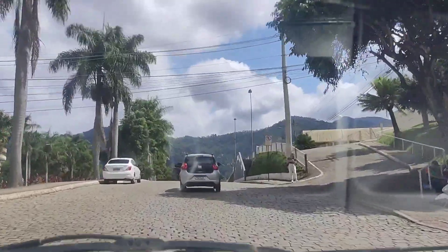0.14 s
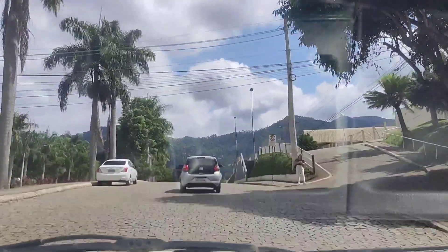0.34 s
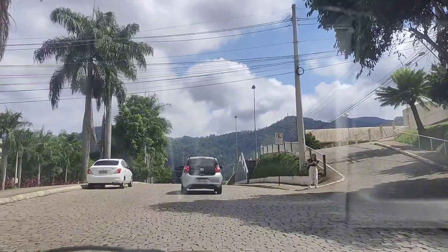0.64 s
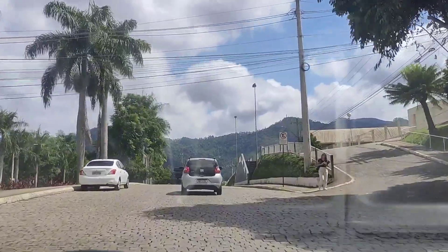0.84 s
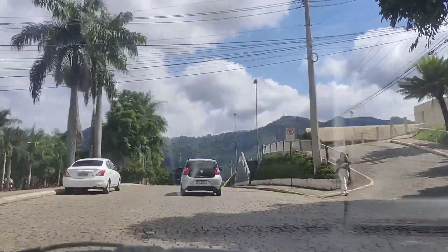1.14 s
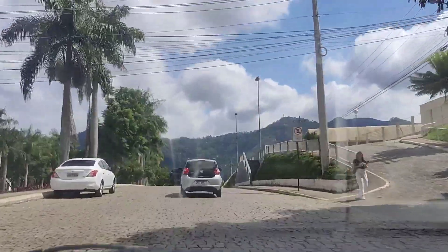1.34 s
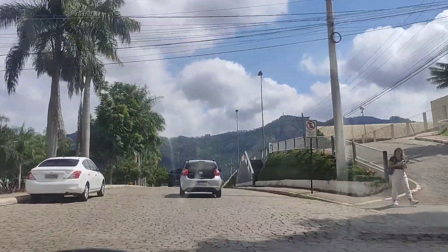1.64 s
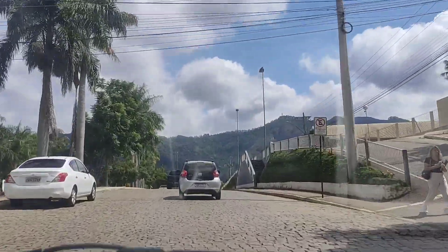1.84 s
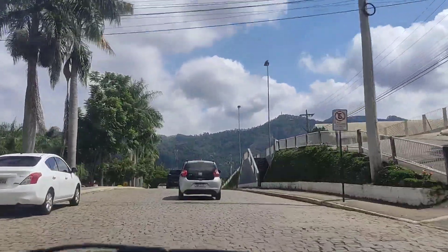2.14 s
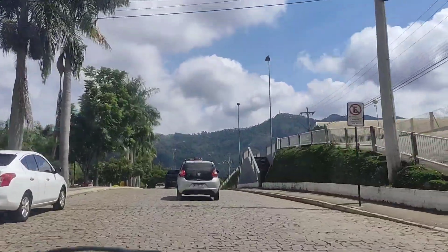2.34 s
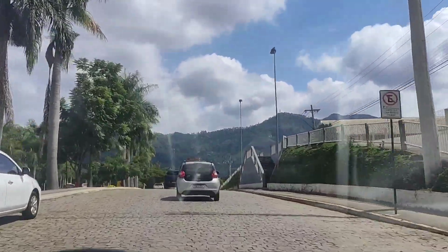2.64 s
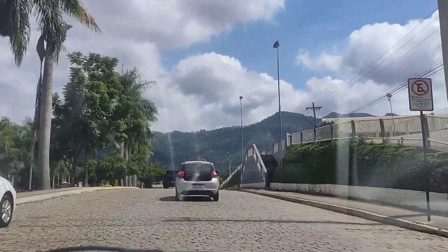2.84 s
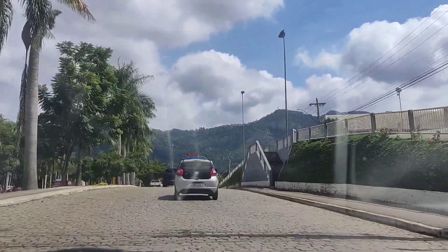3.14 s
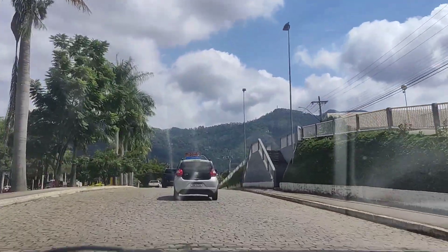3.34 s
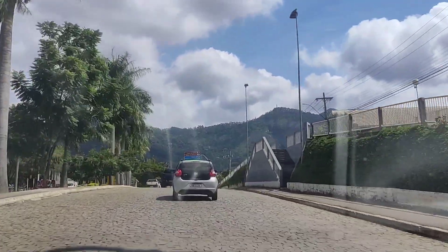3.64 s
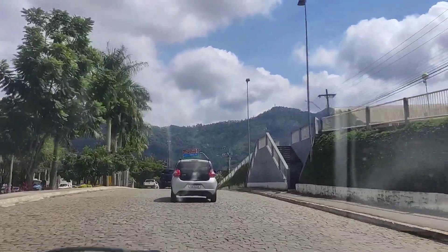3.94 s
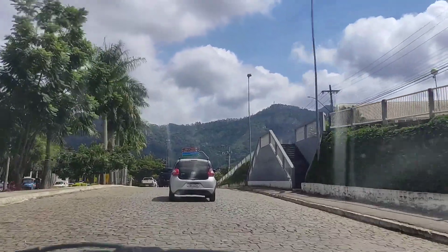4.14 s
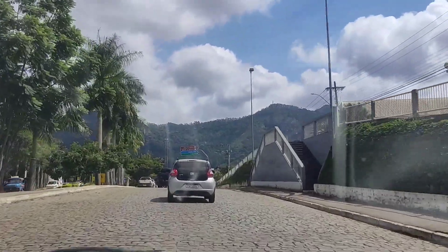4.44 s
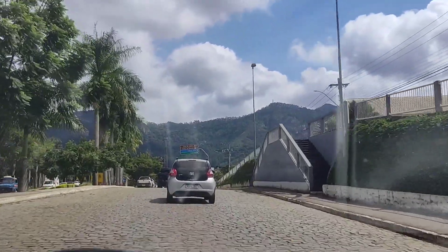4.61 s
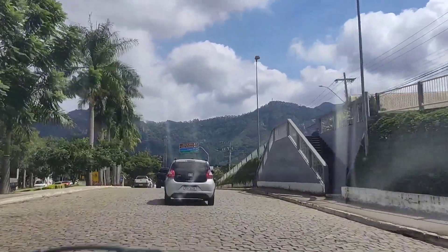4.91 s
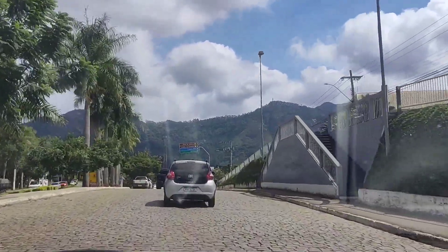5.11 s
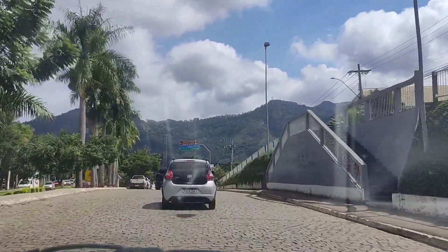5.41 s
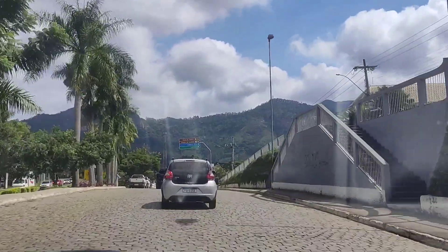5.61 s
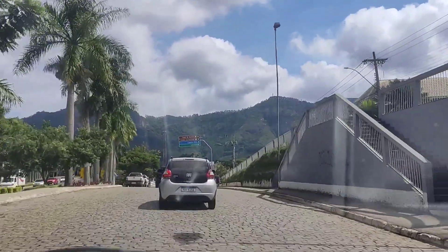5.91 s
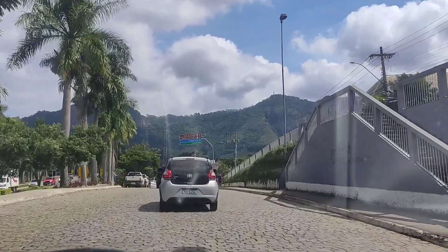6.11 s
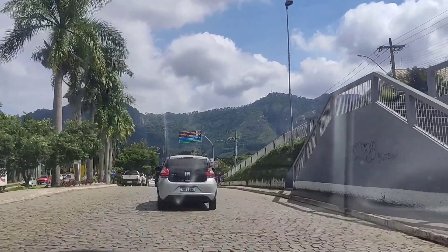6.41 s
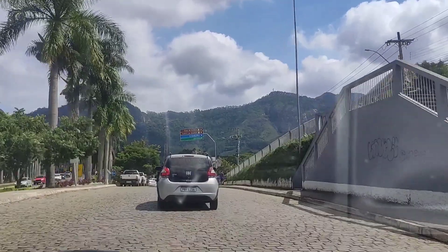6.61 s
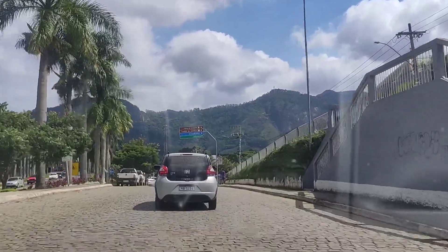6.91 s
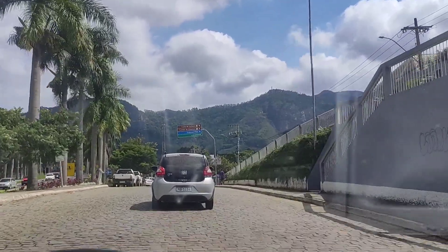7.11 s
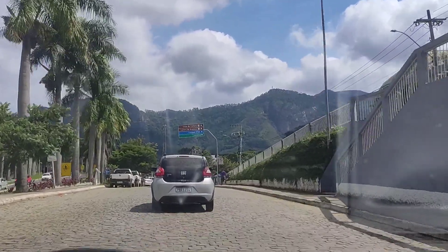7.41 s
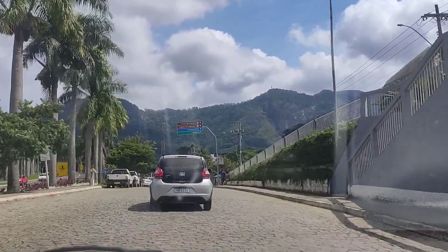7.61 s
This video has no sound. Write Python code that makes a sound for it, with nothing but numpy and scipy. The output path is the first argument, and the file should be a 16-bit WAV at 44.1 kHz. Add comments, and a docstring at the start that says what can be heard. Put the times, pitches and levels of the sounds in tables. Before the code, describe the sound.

A small car rolls slowly over cobblestones, heard from inside the closed cabin for about eight seconds. The main sound is a continuous, uneven low boom from the tyres and body, with a hollow tread roll above it. A low engine hum swells and recedes underneath, dropping slightly in pitch after about 4.5 seconds.

Raised stones give dull, irregular suspension thuds, notably at 0.2 seconds, between 1 and 2.2, around 3.1 and 4.2, and from 5.6 to 6.3. The shaking sets off quieter interior noises: trim rustles, the dashboard buzzes faintly, and a loose plastic part ticks irregularly throughout, more busily at the start and after 5.3 seconds. Panels chatter in short bursts with the jolts, and give brief, bright cracks near 0.2, 3.2, 4.2 and 7.6 seconds, the sharpest at 3.2. The rumble carries on at much the same level to the end.

```python
"""Tyres of a small car roll slowly over cobblestones, heard inside the closed cabin.
Each stone bumps the tyres and makes the body boom; proud stones thud into the suspension.
The engine hums low through the bulkhead. The shaking sets the trim rustling and the
panels rattling, cracking against their stops and faintly buzzing; one loose plastic part ticks."""
import sys
import numpy as np
from scipy import signal
from scipy.fft import rfft, irfft, next_fast_len
from scipy.io import wavfile
from scipy.ndimage import uniform_filter1d, map_coordinates

SR = 44100
rng = np.random.default_rng(int(sys.argv[2]) if len(sys.argv) > 2 else 0)


def wrap_up_sound(samples):
    """Save the sound to the file named by the first command line argument, as 16-bit audio."""
    columns = np.atleast_2d(samples).T
    # keep every value between -1 and 1, then stretch to whole-number steps
    tamed = np.clip(columns, -1, 1)
    steps = np.round(tamed * 32767).astype(np.int16)
    wavfile.write(sys.argv[1], SR, steps)


N = 342216

# rough and smooth paving: time_s, boom_db, roll_db
PAVING = [(0, -34, -45), (.25, -28, -45.5), (.58, -28.5, -46.5), (.75, -32.5, -47), (1.05, -30, -46.5),
          (1.85, -32, -45), (2.3, -29, -45.5), (2.4, -33, -50.5), (2.85, -32, -46.5), (3.1, -32.5, -50),
          (3.17, -33.5, -41.5), (3.5, -31.5, -48), (4.05, -30.5, -45.5), (4.4, -31, -44.5),
          (4.9, -30.5, -49), (5.25, -30, -43.5), (5.5, -30, -45), (5.97, -30, -48), (6.03, -34, -51),
          (6.24, -34, -47), (6.33, -31.5, -46.5), (7.1, -28.5, -46), (7.3, -29.5, -45),
          (7.76, -30.5, -43.5)]
# proud stones: start_s, thud_db, extra_boom_db
PROUD_STONES = [(0.195, -29.5, 1), (0.998, -32.5, 0), (1.247, -33.5, 5.5), (1.288, -30, -3), (1.36, -31, 4),
                (1.709, -35.5, 5.5), (1.784, -33.5, 5.5), (1.909, -30.5, 1), (2.14, -30, 0.5),
                (2.668, -33, -0.5), (2.791, -37.5, 4), (3.149, -28.5, 2.5), (3.196, -36.5, 3),
                (3.301, -37.5, 1.5), (4.221, -29.5, 5), (4.257, -32, -3.5), (4.386, -34.5, 2),
                (4.588, -46, 5.5), (4.821, -32, 3.5), (4.925, -32, -4.5), (5.19, -33, 5.5),
                (5.323, -35, -1.5), (5.471, -43.5, 5), (5.592, -26.5, 1.5), (5.759, -42, 1.5),
                (5.813, -36.5, 0.5), (5.922, -33.5, 6.5), (5.94, -28.5, -1.5), (5.968, -35, 0),
                (6.3, -30.5, 5), (6.699, -40, 2), (7.132, -33.5, 4), (7.323, -33, -4.5), (7.515, -40.5, -1),
                (7.588, -43, 1)]
# rubbing trim: freq_hz, gain_db
RUB_SPECTRUM = [(700, -26), (1400, 2.5), (2100, 4.5), (2700, -1), (3400, -1.5), (3800, -7.5), (5100, -2.5),
                (5700, -4), (6100, 3), (6700, 0.5), (7500, 1.5)]
# dashboard resonances: freq_hz, width_hz, level_db
PANEL_MODES = [(1544, 350, -8), (1980, 67, -11.5), (2097, 72, -15.5), (2474, 83, -22)]


def tyres():
    """Stones strike the tyres: a boom through the suspension, a higher, hollow roll from the treads."""
    # body boom: freq_hz, gain_db
    boom_spectrum = [(14, -66), (22, -21.5), (29, -3), (38, 2), (46, -3), (62, 4.5), (75, 1.5), (112, 3),
                     (128, 5), (152, -5), (186, -1), (222, -11.5), (260, -9.5), (900, -120)]
    # tread roll: freq_hz, gain_db
    roll_spectrum = [(90, -55), (220, 1.5), (300, 3.5), (345, -3), (430, -4), (560, -8.5), (680, -16.5),
                     (880, -21.5), (1000, -21), (1300, -28), (2300, -41), (3300, -48), (7000, -88.5)]
    # hollow tyre ring: freq_hz, width_hz, level_db
    tyre_modes = [(778, 36, -16)]
    boom_db, roll_db = curves(PAVING)
    stones = impacts(rate_hz=300, spread_db=1.5)
    boom = levelled(coloured(stones, boom_spectrum), window_s=0.12)
    grit = amp(5.5) * impacts(rate_hz=2500, spread_db=0.5)
    tread = unit(stones + grit)
    hollow = ringing(impacts(rate_hz=1200, spread_db=3), tyre_modes)
    roll = levelled(coloured(tread, roll_spectrum), window_s=0.1) + hollow
    uneven_db = 1.3 * wobble(rate_hz=9)  # unevenly laid stones
    return amp(boom_db + body_rocking_db() - 0.5) * boom + amp(roll_db + uneven_db + 2.3) * roll


def body_rocking_db(peak_s=0.019):
    """Each proud stone rocks the body: the boom swells or dips, then settles."""
    t = np.arange(SR) / SR
    rocking = t / peak_s * np.exp(1 - t / peak_s)
    extra_db = np.zeros(N)
    for start_s, _, extra_boom_db in PROUD_STONES:
        add(extra_db, start_s, extra_boom_db * rocking)
    return extra_db


def suspension_thuds(gain_db=19.5, stiffening_per_db=0.022):
    """Rubber rounds off each blow; a harder one compresses the tyre further and knocks higher."""
    # average blow through the suspension: freq_hz, gain_db
    thud_spectrum = [(90, -27.5), (260, 8), (560, -10.5), (1100, -29.5), (4000, -73.5)]
    track = np.zeros(N)
    mean_db = np.mean([thud_db for _, thud_db, _ in PROUD_STONES])
    for start_s, thud_db, _ in PROUD_STONES:
        pitch_ratio = np.exp(stiffening_per_db * (thud_db - mean_db))
        spectrum = [(hz * pitch_ratio, db) for hz, db in thud_spectrum]
        add(track, start_s, amp(thud_db + gain_db) * strike(spectrum, tail_db=-28, t60_s=0.09))
    return track


def engine():
    """The firing rate and two weak overtones come through the bulkhead."""
    # engine speed: time_s, firing_hz
    speed = [(0, 49.1), (.9, 52), (1.7, 50.92), (2.3, 52.3), (3.1, 50.25), (3.7, 50.5), (4.6, 51.8),
             (5.5, 48.15), (6.5, 46.2), (7.76, 45)]
    # engine load: time_s, hum_db
    load = [(0, -33.5), (.3, -38), (.55, -29), (1.25, -32.5), (1.65, -33), (1.95, -29), (2.4, -25.5),
            (2.65, -34.5), (3, -32), (3.65, -27.5), (4.1, -34.5), (4.8, -40.5), (5.5, -33), (6.1, -44),
            (6.55, -29.5), (6.85, -55), (7.2, -34), (7.76, -41)]
    firing_hz, = curves(speed)
    hum_db, = curves(load)
    drift = 1 + 0.0063 * wobble(rate_hz=4.2)
    phase = 2 * np.pi * np.cumsum(firing_hz * drift) / SR
    hum = np.sin(phase) + amp(-15.5) * np.sin(2 * phase) + amp(-24) * np.sin(3 * phase)
    return amp(hum_db - 4) * unit(hum)


def panel_rattles(rise_s=0.0075, t60_s=0.087, knock_db=-10, scratch_db=-11):
    """A jolt sets a panel chattering: a quick swarm of contacts that dies away."""
    # harder jolts: start_s, level_db, treble_db
    jolts = [(0.1446, -48, -18), (0.193, -36, -30), (0.643, -41, -23), (0.801, -45, -10), (1.022, -47, -4),
             (1.196, -46, -18), (1.519, -45.5, -7.5), (1.619, -39.5, -24), (1.8945, -44.5, -13),
             (2.148, -45, -8), (2.28, -48, -20), (2.303, -45, -17), (2.655, -43, -15), (2.8025, -46, -24),
             (3.145, -43.5, -12), (3.17, -53, -13), (4.21, -41, -7), (4.228, -46, -22), (4.391, -41, -17),
             (4.4634, -51, -14), (4.606, -45, -7), (4.768, -40, -11), (4.801, -44, -20), (4.825, -47, -27),
             (5.0883, -42.5, -11), (5.3867, -52.5, 2), (5.526, -43.5, -14), (5.576, -42, -25),
             (6.324, -47.5, -2), (7.54, -43.5, -11), (7.588, -43.5, -14)]
    # chattering panel: freq_hz, gain_db
    chatter_spectrum = [(250, -37), (750, 13), (1050, 11.5), (1500, 5.5), (1800, -3), (2300, -7.5),
                        (2800, -30.5), (3400, -22), (4200, -27), (7500, -7.5)]
    t = np.arange(SR // 4) / SR
    swarm = (1 - np.exp(-t / rise_s)) ** 2 * amp(-60 * t / t60_s)
    swarm /= swarm.max()
    knock_env, scratch_env = np.zeros(N), np.zeros(N)
    for start_s, level_db, treble_db in jolts:
        add(knock_env, start_s - rise_s / 2, amp(level_db + knock_db) * swarm)
        add(scratch_env, start_s - rise_s / 2, amp(level_db + treble_db + scratch_db) * swarm)
    contacts = impacts(rate_hz=1700, spread_db=2) * clumps(rate_hz=220, depth_db=3)
    panel = unit(coloured(contacts, chatter_spectrum)) + ringing(contacts, PANEL_MODES)
    knock = levelled(panel, window_s=0.015)
    scratch = levelled(coloured(contacts, RUB_SPECTRUM), window_s=0.034)
    return knock_env * knock + scratch_env * scratch


def panel_cracks(gain_db=11):
    """A panel hits its stop: one hard, bright contact and a short clatter."""
    # hits on the stop: start_s, level_db
    hits = [(0.201, -43), (0.21, -59), (0.647, -54), (0.658, -56), (3.152, -38.5), (3.16, -55),
            (4.216, -46), (7.596, -48)]
    # hard contact: freq_hz, gain_db
    slap_spectrum = [(500, -20), (1000, -4), (1600, 2), (2400, -3), (3400, 1), (4500, -7), (7500, -4),
                     (9000, -30)]
    track = np.zeros(N)
    for start_s, level_db in hits:
        add(track, start_s, amp(level_db + gain_db) * strike(slap_spectrum, tail_db=-22, t60_s=0.045))
    return track


def plastic_ticks(gain_db=0.3, scrape_db=-14.5, scrape_t60_s=0.03):
    """Loose plastic snaps, knocks the panel behind it and scrapes as it settles."""
    # contacts of the loose part: start_s, level_db
    ticks = [(0.059, -50.5), (0.129, -52), (0.194, -52), (0.2538, -52.5), (0.3166, -53.5), (0.379, -48.5),
             (0.392, -56), (0.6465, -52), (1.089, -48.5), (1.2065, -52.5), (1.284, -51.5), (1.5837, -50.5),
             (1.9775, -52), (2.0386, -49.5), (2.113, -51.5), (2.369, -51), (2.4296, -55.5), (2.5042, -55),
             (2.6262, -52), (2.7023, -57), (2.8362, -55), (3.214, -61), (3.818, -48.5), (4.085, -53),
             (4.359, -49), (4.413, -51), (4.673, -58), (5.294, -54), (5.47, -55.5), (5.5205, -55),
             (5.577, -54), (5.6474, -52), (5.8673, -54.5), (6.0766, -58.5), (6.1369, -51), (6.193, -56.5),
             (6.327, -51.5), (6.384, -59), (6.4375, -56), (6.548, -51), (6.612, -59), (6.7507, -52),
             (6.812, -54), (6.884, -58), (6.952, -52), (7.0095, -50), (7.055, -47.5), (7.11, -54),
             (7.2438, -52.5), (7.524, -47.5), (7.6523, -45)]
    # its brief flexing: pitch_hz, half_width_s, level_db
    flex_pulses = [(3170, 0.00043, 0), (1950, 0.0006, -10), (6700, 0.0003, -12)]
    # panel behind it: pitch_hz, level_db, t60_s
    mount_modes = [(1390, -1.5, 0.02), (1620, -13.5, 0.012), (2070, -15, 0.0095), (3300, -13.5, 0.016)]
    t = np.arange(SR // 20) / SR - 0.0008  # zero at mid-snap
    after_s = np.maximum(t, 0)
    track = np.zeros(N)
    for start_s, level_db in ticks:
        detune, grit_db, knock_db = rng.standard_normal(3) * (0.04, 3.5, 2)
        snap = sum(amp(db) * np.exp(-(t / half_width_s) ** 2) * np.sin(2 * np.pi * hz * (1 + detune) * t)
                   for hz, half_width_s, db in flex_pulses)
        knock = sum(amp(db + knock_db - 60 * after_s / t60_s) * np.sin(2 * np.pi * hz * after_s)
                    for hz, db, t60_s in mount_modes)
        friction = unit(coloured(rng.standard_normal(len(t)), RUB_SPECTRUM)) * (t > 0)
        scrape = friction * amp(scrape_db + grit_db - 60 * after_s / scrape_t60_s)
        add(track, start_s, amp(level_db + gain_db) * (cabin_echoes(snap) + knock + scrape))
    return track


def trim_rustle(attack_s=0.0031, release_s=0.02):
    """Shaken trim rubs in clumps of tiny slips, louder while it slides."""
    # steady shaking: time_s, level_db
    shaking = [(0, -44.5), (.09, -76), (.25, -64), (.55, -62), (.72, -62.5), (1.4, -68.5), (2.5, -68.5),
               (3.05, -71.5), (3.35, -69.5), (3.7, -69.5), (4.05, -66.5), (4.5, -66), (4.9, -74),
               (5.45, -65), (6, -73.5), (6.27, -70), (6.7, -68), (7.35, -72.5), (7.76, -72)]
    # sliding bouts: start_s, length_s, level_db
    slides = [(0.136, 0.027, -60), (0.185, 0.023, -56), (0.31, 0.058, -70), (0.58, 0.06, -60),
              (0.778, 0.083, -68.5), (0.997, 0.029, -65), (1.258, 0.061, -67), (1.5, 0.15, -72),
              (1.894, 0.07, -63.5), (2.086, 0.035, -64), (2.275, 0.043, -64.5), (2.477, 0.056, -66),
              (2.613, 0.1, -73), (3.126, 0.045, -63), (3.538, 0.32, -69), (4.183, 0.03, -68),
              (4.253, 0.026, -60), (4.387, 0.013, -61), (4.77, 0.063, -73.5), (5, 0.026, -66),
              (5.125, 0.025, -65), (5.367, 0.029, -70), (5.497, 0.14, -76), (6.113, 0.02, -66),
              (6.783, 0.015, -72), (7.518, 0.052, -66)]
    shaking_db, = curves(shaking)
    envelope = amp(shaking_db + 2.7 * wobble(rate_hz=26))
    t = np.arange(SR // 2) / SR
    for start_s, length_s, level_db in slides:
        bout = np.interp(t, [0, attack_s, max(length_s, attack_s), length_s + release_s], [0, 1, 1, 0])
        add(envelope, start_s, amp(level_db) * bout)
    slips = impacts(rate_hz=6000, spread_db=4.5) * clumps(rate_hz=80, depth_db=3)
    return envelope * levelled(coloured(slips, RUB_SPECTRUM), window_s=0.13)


def dashboard_buzz():
    """The dashboard rings faintly with the road."""
    _, roll_db = curves(PAVING)
    contacts = impacts(rate_hz=1300, spread_db=4) * clumps(rate_hz=25, depth_db=2)
    return amp(roll_db - 27) * unit(ringing(contacts, PANEL_MODES))


def cabin_echoes(sound, delay_s=0.0028, t60_s=0.042, level_db=-7):
    """A short sound plus its quickly damped reflections off glass and dashboard."""
    t = np.arange(len(sound)) / SR
    echoes = rng.standard_normal(len(t)) * (t > delay_s) * amp(-60 * t / t60_s)
    echoes /= np.linalg.norm(echoes)
    return sound + amp(level_db) * signal.fftconvolve(sound, echoes)[:len(t)]


def strike(spectrum, tail_db, t60_s):
    """One hard contact with a brief diffuse tail, energy 1."""
    t = np.arange(SR // 20) / SR
    blow = amp(tail_db - 60 * t / t60_s) * rng.standard_normal(len(t)) * (t > 0.001)
    blow[0] = 1
    sound = coloured(blow, spectrum)
    return sound / np.linalg.norm(sound)


def ringing(x, modes):
    """x rings each mode at its own level; what lies far above each mode is rolled off."""
    def mode(f, hz, width_hz):
        resonance = 1j * f * width_hz / (hz ** 2 - f ** 2 + 1j * f * width_hz)
        return resonance / (1 + (f / (2 * hz)) ** 6)
    return sum(amp(db) * unit(filtered(x, lambda f: mode(f, hz, width_hz))) for hz, width_hz, db in modes)


def impacts(rate_hz, spread_db):
    """Random pushes and pulls of uneven size, rms 1."""
    hit = rng.random(N) < rate_hz / SR
    direction = np.sign(rng.standard_normal(N))
    return unit(hit * direction * amp(spread_db * rng.standard_normal(N)))


def clumps(rate_hz, depth_db):
    """Random gain that bunches contacts."""
    return amp(depth_db * wobble(rate_hz))


def wobble(rate_hz):
    """Smooth random curve."""
    knots = rng.standard_normal(int(N * rate_hz / SR) + 4)
    return map_coordinates(knots, [np.arange(N) * rate_hz / SR])


def coloured(x, spectrum):
    """x through a minimum-phase filter with rows of freq_hz, gain_db."""
    freq_hz, gain_db = np.transpose(spectrum)

    def response(hz):
        magnitude = amp(np.interp(np.log(hz + 1), np.log(freq_hz), gain_db))
        cepstrum = irfft(np.log(magnitude))
        cepstrum[1:len(hz) - 1] *= 2
        cepstrum[len(hz):] = 0
        return np.exp(rfft(cepstrum))
    return filtered(x, response)


def filtered(x, response):
    """x through a complex frequency response."""
    size = 2 * next_fast_len(len(x))
    return irfft(rfft(x, size) * response(np.fft.rfftfreq(size, 1 / SR)), size)[:len(x)]


def levelled(x, window_s):
    """x held near rms 1 over a sliding window."""
    size = int(window_s * SR / 2) + 1
    power = uniform_filter1d(uniform_filter1d(x ** 2, size), size)
    return x / np.sqrt(np.abs(power) + 1e-12)


def curves(rows):
    """Per-sample curve for each column after time_s."""
    time_s, *columns = np.transpose(rows)
    return [np.interp(np.arange(N) / SR, time_s, column) for column in columns]


def add(track, start_s, sound):
    part = track[max(round(start_s * SR), 0):][:len(sound)]
    part += sound[:len(part)]


def amp(db):
    return 10 ** (np.asarray(db) / 20)


def unit(x):
    return x / np.sqrt(np.mean(x ** 2) + 1e-20)


def scene():
    """Road, engine and shaken fittings, mono."""
    driving = tyres() + suspension_thuds() + engine()
    fittings = trim_rustle() + panel_rattles() + panel_cracks() + dashboard_buzz() + plastic_ticks()
    return (driving + fittings)[None]


def record(dry):
    """Steep low-pass."""
    cutoff_hz = 7560
    return filtered(dry[0], lambda hz: 1 / np.sqrt(1 + (hz / cutoff_hz) ** 500))[None]


dry = scene()
out = record(dry)
wrap_up_sound(out)
```